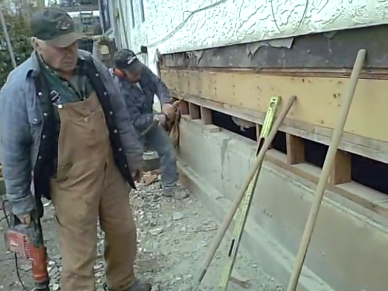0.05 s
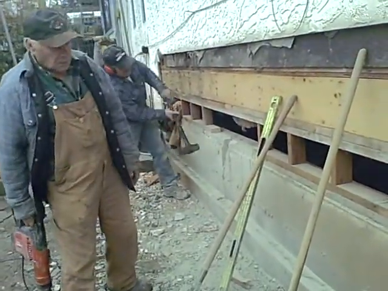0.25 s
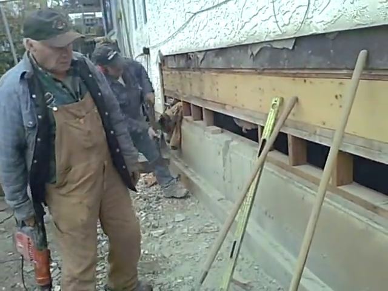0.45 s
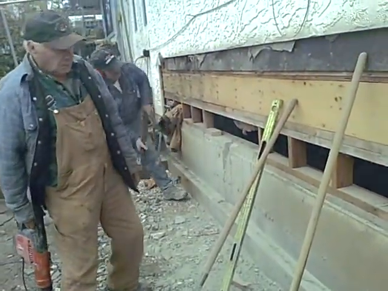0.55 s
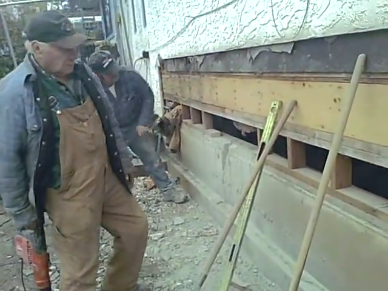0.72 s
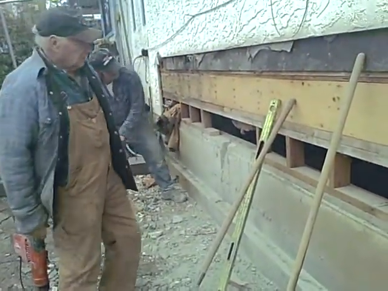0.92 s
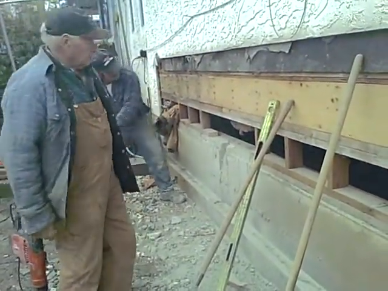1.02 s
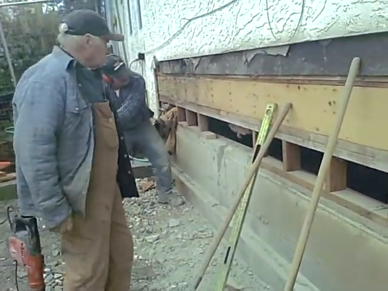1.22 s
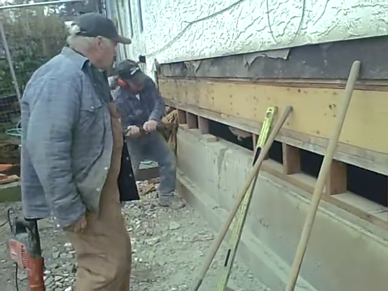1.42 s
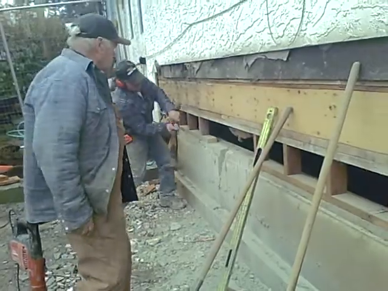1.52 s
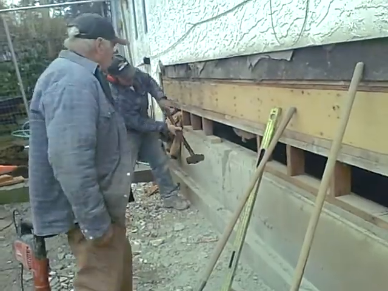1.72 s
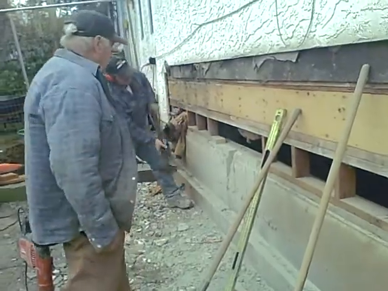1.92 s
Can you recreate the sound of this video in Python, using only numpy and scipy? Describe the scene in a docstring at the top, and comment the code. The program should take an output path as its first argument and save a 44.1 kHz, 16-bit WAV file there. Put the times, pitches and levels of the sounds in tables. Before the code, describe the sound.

A sledgehammer hits a concrete wall twice outdoors, each blow ringing briefly and overloading the microphone. Close by, a hammer drill coasts to a stop with a fading whine and slowing ticks. A boot faintly scuffs gravel before the second blow.

```python
"""In an outdoor yard, a sledgehammer hits a concrete foundation wall twice, hard enough to overload the
microphone. The wall and its timber sill ring briefly and the yard throws the blows back. Close by, a
rotary hammer drill coasts to a stop, its gears whining and its striker ticking ever more slowly.
A boot scuffs the gravel just before the second blow, over a soft outdoor hush."""
import sys
import numpy as np
from scipy import signal
from scipy.fft import rfft, irfft
from scipy.io import wavfile
from scipy.ndimage import uniform_filter1d

SR = 44100
rng = np.random.default_rng(int(sys.argv[2]) if len(sys.argv) > 2 else 0)


def bounce(signal):
    """Save signal as a 16-bit WAV file at the path given by the first command-line argument."""
    frames = np.transpose(np.atleast_2d(signal))
    limited = np.clip(frames, -1, 1)
    pcm = np.round(limited * 32767).astype(np.int16)
    wavfile.write(sys.argv[1], SR, pcm)


N = 85995
T = np.arange(N) / SR
AGE = T[:SR // 2]  # seconds since a short sound began

# Ticks of the drill's striker, one per turn of its crank: t/s, relative level/dB
STRIKER_TICKS = [(0.0189, 1.5), (0.0461, 1), (0.0748, 2.5), (0.106, 0.5), (0.1375, 2), (0.1719, 2),
                 (0.2072, -11), (.2456, 0.5), (0.2862, -1), (0.3304, -4), (.3782, -6), (.4308, -4),
                 (0.4894, -6.5), (0.554, -7), (.6260, -9.5), (0.711, -15), (0.8163, -16), (0.952, -22),
                 (1.176, -27)]


def amp(db):
    """Turn decibels into a number to multiply a sound by."""
    return 10 ** (np.asarray(db) / 20)


def unit(x):
    """Scale a signal to an average strength (rms) of 1."""
    return x / np.sqrt(np.mean(x ** 2) + 1e-20)


def noise(spectrum, size):
    """Noise of strength 1, its tone shaped by rows that start with f/Hz, relative level/dB."""
    row_hz, row_db = np.transpose(spectrum)[:2]
    hz = np.fft.rfftfreq(size, 1 / SR)
    gain = amp(np.interp(np.log(hz + 1), np.log(row_hz), row_db))
    return unit(irfft(rfft(rng.standard_normal(size)) * gain, size))


def fade(t60):
    """Die away by 60 dB in t60 seconds, the 'fade time' in the tables."""
    return np.exp(-np.log(1000) * AGE / t60)


def ramp(rise_s):
    """Climb from silence to full level, then stay there."""
    return np.minimum(AGE / rise_s, 1)


def lowpass(x, hz, taps):
    """Cut the treble above hz; more taps make a steeper cut."""
    return signal.fftconvolve(x, signal.firwin(taps, hz, window=("kaiser", 9), fs=SR), "same")


def tone(hz):
    """A pure tone that follows a changing pitch."""
    return np.sin(2 * np.pi * np.cumsum(hz) / SR)


def drill_motor():
    """Gear whine, motor whistle and fan follow the slowing crank; piston strokes make the whine throb."""
    # Swell and fall of the gear whine: t/s, relative level/dB
    whine_levels = [(0, -26), (.06, -22), (.125, -17), (.19, -22.5), (.33, -32), (.48, -34), (.7, -52)]
    # Piston strokes that load the gears: lead before a tick/turns, width/turns, relative level/dB
    strokes = [(.145, 0.064, -2), (.71, 0.044, -7.5)]
    # Rush of the fan and bearings: f/Hz, relative level/dB
    fan_spectrum = [(100, 5.5), (350, -8), (720, 12), (1400, -2.5), (2200, 4), (3200, 3), (4600, -8),
                    (5500, -6), (6300, 4), (7500, -35.5)]
    gear_teeth, whistle_cycles_per_turn, start_turns_per_s = 40, 170, 38
    times = np.array([s for s, _ in STRIKER_TICKS])
    gaps = np.diff(times)
    middles = np.r_[times[0] - gaps[0] / 2, times[:-1] + gaps / 2, times[-1]]
    speed = np.interp(T, middles, np.r_[start_turns_per_s, 1 / gaps, 0])  # turns per second
    speed_share = speed / speed[0]
    turns = np.interp(T, np.r_[times[0] - gaps[0], times], np.arange(len(times) + 1))
    load = amp(-18)  # slack gears between strokes
    for lead, width, db in strokes:
        turns_from_stroke = (turns + lead + .5) % 1 - .5
        load += amp(db) * np.exp(-(turns_from_stroke / width) ** 2 / 2)
    waver = unit(uniform_filter1d(rng.standard_normal(N), size=150))  # random wobble in pitch
    whine = tone(gear_teeth * speed * (1 + .02 * waver)) * load
    whine *= amp(np.interp(T, *np.transpose(whine_levels)))
    whine *= np.minimum(10 * speed_share, 1)  # silent once the crank stops
    whistle = amp(-39) * speed_share ** 5 * tone(whistle_cycles_per_turn * speed * (1 + .006 * waver))
    fan = amp(-35) * speed_share ** 1.88 * noise(fan_spectrum, N)
    return whine + whistle + fan


def outdoor_hush():
    """A soft background wash that slowly gets a little quieter."""
    # Tone of the background: f/Hz, relative level/dB
    hush_spectrum = [(25, -7.5), (50, 0.5), (92, -2), (125, -8.5), (220, -10), (340, -16.5), (480, -8.5),
                     (800, -6), (1300, -5), (1800, -14.5), (2700, -21.5), (3500, -20), (4600, -29.5),
                     (6400, -22), (7400, -39)]
    db_at_1_s, db_per_s = -40.5, -1.83
    return amp(db_at_1_s + db_per_s * (T - 1)) * noise(hush_spectrum, N)


def drill_striker():
    """The drill's striker clicks and rings once per turn, then bounces back faintly."""
    # Ringing notes of the striker: f/Hz, relative level/dB, fade time/s
    striker_notes = [(5890, -2.5, 0.016), (6125, 1.5, 0.017), (6460, -11, 0.024)]
    # Dry click of each tick: f/Hz, relative level/dB
    click_spectrum = [(800, -10.5), (2800, -10.5), (4600, -6.5), (5800, -8.5), (7000, -15), (9000, -2)]
    bounce_s, bounce_db = .0034, -25.5
    out = np.zeros(N)
    ring = sum(amp(db) * fade(t60) * np.sin(2 * np.pi * hz * AGE) for hz, db, t60 in striker_notes)
    for s, db in STRIKER_TICKS:
        click = noise(click_spectrum, len(AGE)) * fade(t60=0.027)
        tick = amp(db) * (amp(-21) * ring + amp(-20.5) * click) * ramp(rise_s=0.00078)
        add(out, s, tick)
        add(out, s + bounce_s, amp(bounce_db) * tick)
    return out


def add(mix, s, sound):
    """Mix a sound in, starting at s seconds."""
    part = mix[max(round(s * SR), 0):][:len(sound)]
    part += sound[:len(part)]


def sledgehammer():
    """Each blow cracks on the concrete, rings the wall and comes back as echoes and a lingering tail."""
    # Hammer blows: t/s, relative level/dB, brightness of the ring/(dB per octave), extra crack/dB
    blows = [(0.2073, 1.5, -2, 3), (1.6214, 0.5, -2.24, 1.5)]
    # Ringing notes of wall, sill and hammer head: f/Hz, relative level/dB, fade time/s, rise time/s
    wall_notes = [(115.2, -18, .18, 0.019), (232.6, -3.5, 0.074, 0.0062), (344, 2, 0.071, 0.01),
                  (394.5, -0.5, 0.074, 0.0099), (596.6, -3, 0.088, 0.0038), (682.3, -3, 0.086, 0.0062),
                  (770, 10.5, 0.05, 0.0041), (968.4, -6, 0.16, 0.0046), (1124, 1, 0.043, 0.00053),
                  (1242.4, -2.5, 0.059, 0.00033), (1357, -10.5, 0.057, .0004), (1610, -12, 0.081, 0.0013),
                  (2238, -10.5, 0.068, 0.00035), (2734, -16, .035, 0.0022)]
    # Crack of steel on concrete: f/Hz, relative level/dB
    crack_spectrum = [(25, -33), (70, -15), (160, -29.5), (280, 11), (700, 6), (1200, 12.5), (1800, -4),
                      (3000, -16), (4500, -13.5), (7000, -30)]
    # Echoes from nearby walls: delay/s, relative level/dB
    echoes = [(.0105, -19), (.044, -30), (.086, -33.5)]
    tail_db = -13
    out = np.zeros(N)
    for s, db, brightness, crack_db in blows:
        ring = np.zeros(len(AGE))
        for hz, note_db, t60, rise_s in wall_notes:
            gain = amp(note_db + brightness * np.log2(hz / 700))
            swell = 1 - np.exp(-(AGE / rise_s) ** 2)
            ring += gain * fade(t60) * swell * np.sin(2 * np.pi * hz * AGE)
        crack = noise(crack_spectrum, len(AGE)) * fade(t60=0.075) * ramp(rise_s=0.00055)
        blow = amp(db) * (ring + amp(crack_db - 1) * crack)
        add(out, s, blow)
        for delay, echo_db in echoes:
            add(out, s + delay, amp(echo_db) * blow)
        add(out, s, amp(db + tail_db) * yard_tail())
    return out


def yard_tail(rise_s=0.004):
    """A blow lingers in the yard as a burst of noise; each band of pitches dies at its own rate."""
    # Reverberation of the yard: f/Hz, relative level/dB, fade time/s
    bands = [(25, -7.5, .3), (50, -19, 0.45), (93, -2, 0.3), (220, -4, 0.3), (380, -1, 0.19),
             (717, 1.5, 0.29), (1166, -4, 0.38), (1740, -19.5, 0.28), (3500, -34.5, 0.42),
             (7000, -30.5, 0.2)]
    spectrum = rfft(noise(bands, len(AGE)))
    log_hz = np.log(np.fft.rfftfreq(len(AGE), 1 / SR) + 1)
    centres = np.log([hz for hz, _, _ in bands])
    tail = np.zeros(len(AGE))
    for only_this_band, (_, _, t60) in zip(np.eye(len(bands)), bands):
        band_gain = np.interp(log_hz, centres, only_this_band)
        tail += irfft(spectrum * band_gain, len(AGE)) * fade(t60)
    return tail * (1 - np.exp(-AGE / rise_s))


def boot():
    """A boot rubs the gravel, making short, soft bursts of noise."""
    # Scuffs of the boot: t/s, level/dB
    scuffs = [(1.488, -33.5), (1.524, -32.5)]
    # Tone of the gravel: f/Hz, relative level/dB
    gravel_spectrum = [(100, -11), (400, -11), (850, -4), (1500, -23), (3000, -28), (7000, -34.5)]
    out = np.zeros(N)
    for s, db in scuffs:
        add(out, s, amp(db) * noise(gravel_spectrum, len(AGE)) * fade(t60=0.058) * ramp(rise_s=0.0022))
    return out


def scene():
    """All the sounds together, in one channel."""
    return (drill_motor() + outdoor_hush() + drill_striker() + sledgehammer() + boot())[None]


def record(dry):
    """The microphone loses high treble and overloads on the blows; the recorder shaves the peaks again."""
    treble_limit_hz, ceiling, hardness, recorder_limit = 7630, 0.71, 24, .705
    heard = lowpass(dry[0], treble_limit_hz, taps=141)
    squashed = heard / (1 + abs(heard / ceiling) ** hardness) ** (1 / hardness)
    shaved = np.clip(lowpass(squashed, treble_limit_hz, taps=141), -recorder_limit, recorder_limit)
    return lowpass(shaved, hz=16300, taps=511)[None]


dry = scene()
out = record(dry)
bounce(out)
```